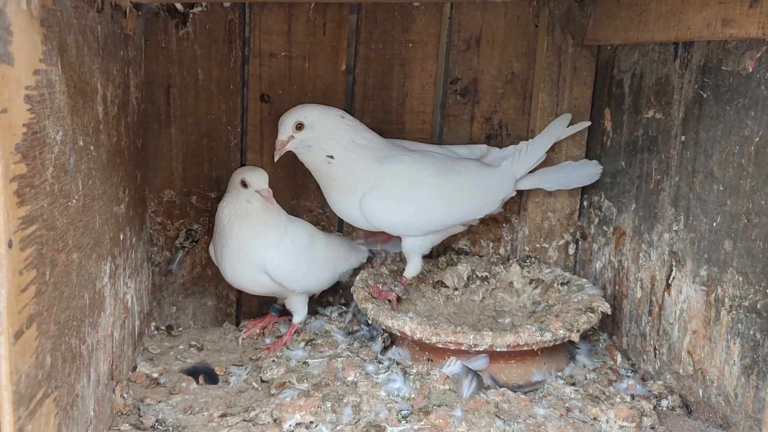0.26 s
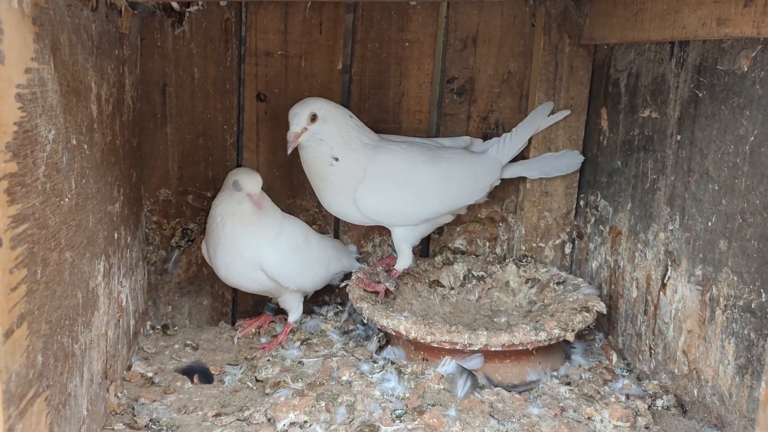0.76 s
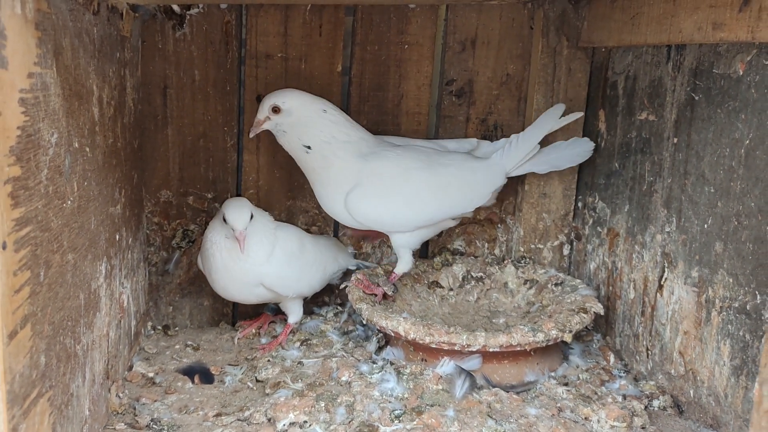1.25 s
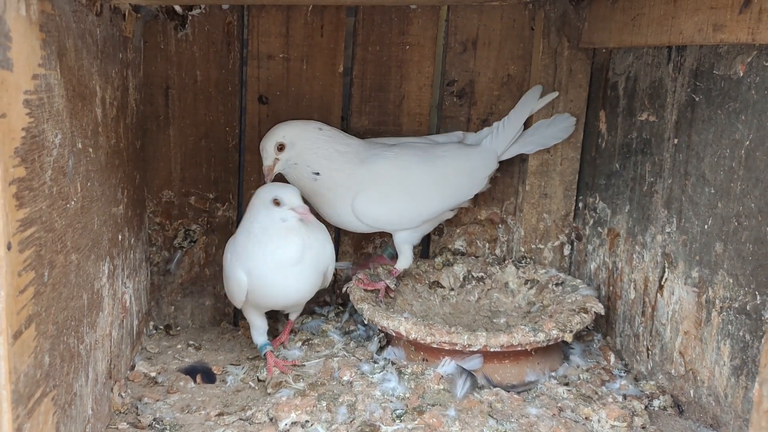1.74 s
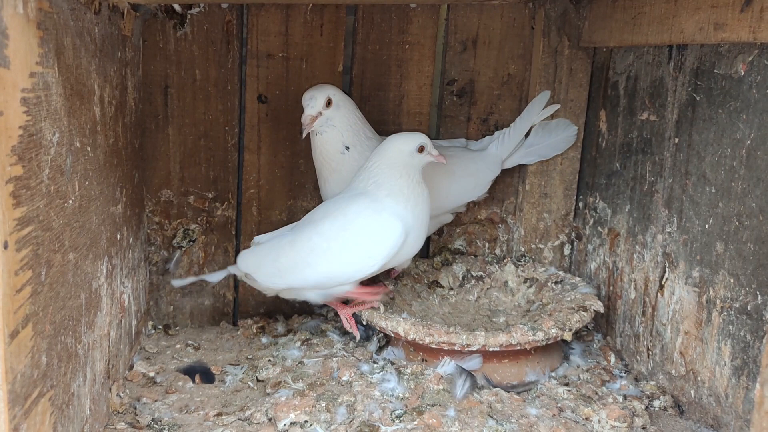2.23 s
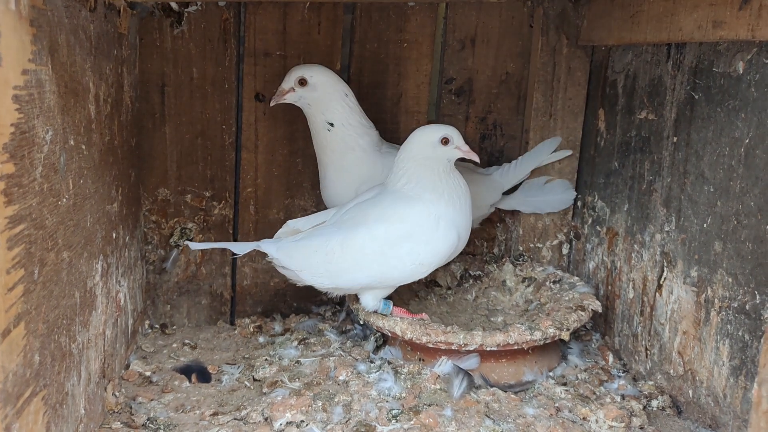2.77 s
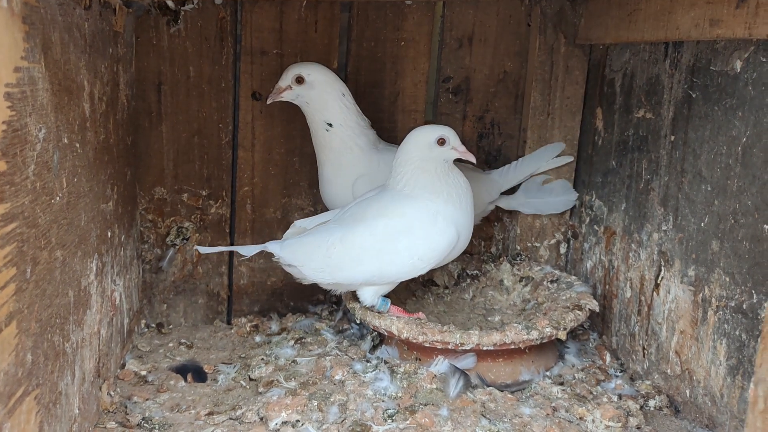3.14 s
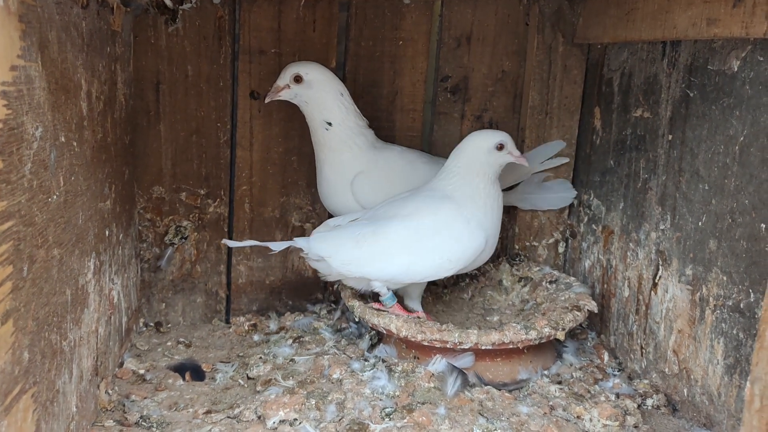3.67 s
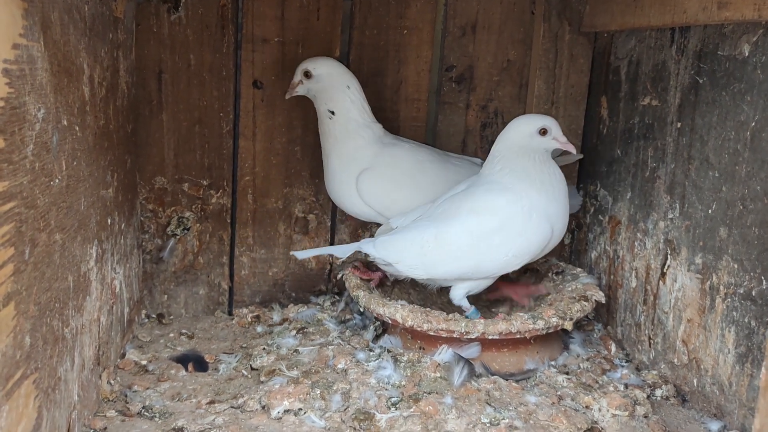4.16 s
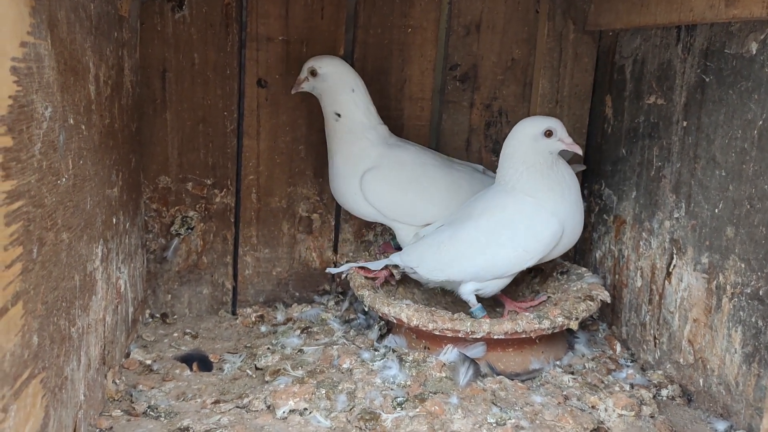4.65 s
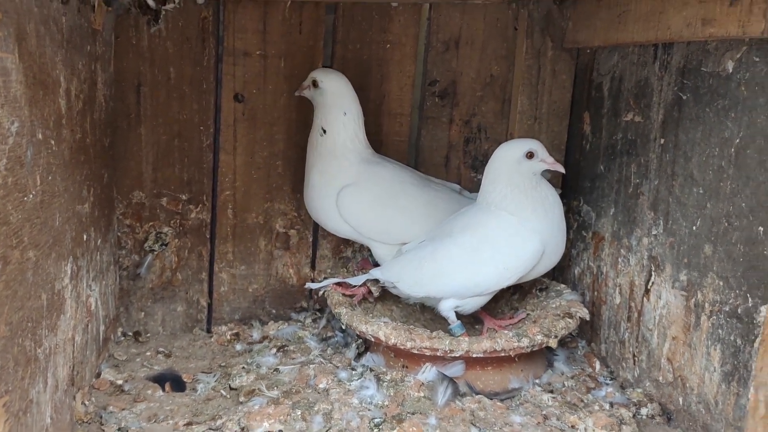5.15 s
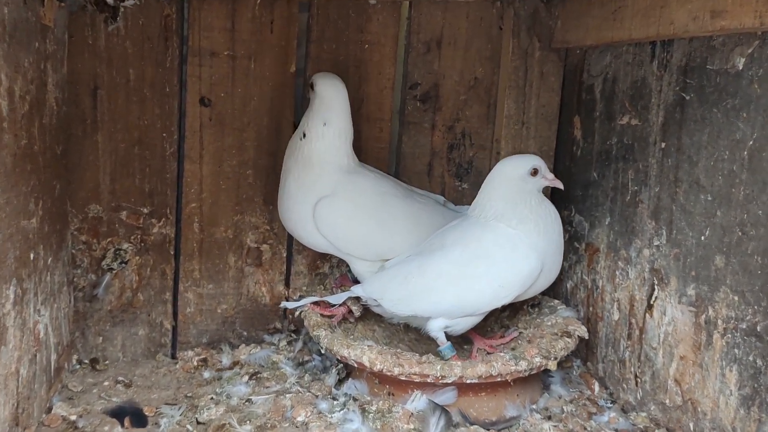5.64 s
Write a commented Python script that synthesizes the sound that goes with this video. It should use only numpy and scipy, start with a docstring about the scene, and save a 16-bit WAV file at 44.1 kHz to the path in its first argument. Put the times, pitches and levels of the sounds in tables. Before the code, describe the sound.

A low, soft rumble and faint hiss fill a small wooden nest box throughout. From the start a pigeon coos close by: short grunts, a throbbing, rattling roll at 0.3-0.6 s, then a low moan rising to a clear crest near 0.9 s. Sharp, airy feather swishes fall at about 0.15, 0.25 and 0.7 s. At 0.95-1.2 s a young bird gives a buzzy squeal and thin whistles from one side, with a soft farther coo beneath. A faint peep and claw ticks come around 1.4-1.6 s, the tick at 1.6 s clearest. The near bird rolls again at 1.7-2.0 s and moans until 2.3 s. Afterwards duller, farther coos continue, some rattling, strongest in a falling note near 3.6 s. Sparse bright clicks with small knocks on clay cluster around 2.4-4 s, then return near 4.9, 5.4 and 5.75 s. A faint two-toned peep sounds at 4.2-4.5 s.

```python
"""A wooden nest box in a loft, where pigeons court over a low rumble.
One coos close by: a crop tone with harmonics, chopped into rattles and swollen by throbs.
Others coo more softly. Young birds squeal, whistle and peep on gliding sines.
Feathers swish and rustle as resonant noise; scuffs are softer bands of it.
Claws tick on the clay nest bowl: noise bursts, each a bright click and a dull knock."""
import sys
import numpy as np
from scipy import signal
from scipy.fft import rfft, irfft, next_fast_len
from scipy.io import wavfile

SR = 44100
rng = np.random.default_rng(int(sys.argv[2]) if len(sys.argv) > 2 else 0)


def digitize_waveform(pressure):
    """Quantize a signal to 16-bit integers and store it at the path in sys.argv[1].

    Rows of a 2-D input are taken as channels; values are limited to [-1, 1].
    """
    field = np.atleast_2d(pressure).T
    bounded = np.clip(field, -1, 1)
    quanta = np.round(bounded * 32767).astype(np.int16)
    wavfile.write(sys.argv[1], SR, quanta)


N = 260190
TIME = np.arange(N) / SR

ROLL_REST_HZ = 234.6  # also the pitch of any coo between its notes
PARTNER_SHARE = 0.83  # strength of the beating tone at full rattle
ATTACK_S, RELEASE_S = 0.0074, 0.018


def from_db(db):
    """Decibels to gain."""
    return 10 ** (np.asarray(db) / 20)


def rms_one(x):
    """Scale to unit power."""
    return x / np.sqrt(np.mean(x ** 2) + 1e-20)


def at_hz(points, hz):
    """Read a spectrum on a log-frequency axis."""
    point_hz, value = np.transpose(points)
    return np.interp(np.log(np.maximum(hz, 1)), np.log(point_hz), value)


def drift(rate_hz):
    """Smooth random wander of rms 1: noise through two equal poles, at a twentieth of the rate."""
    r = np.exp(-40 * np.pi * rate_hz / SR)
    white = rng.standard_normal(N // 20 + 2002)
    slow = signal.lfilter([1], [1, -2 * r, r * r], white)[2000:]  # drop the run-in
    return np.interp(np.arange(N) / 20, np.arange(len(slow)), rms_one(slow))


def resonate(x, hz, width_hz):
    """A two-pole resonance with gain 1 on top."""
    r = np.exp(-np.pi * width_hz / SR)
    zeros = np.array([1, 0, -1]) * (1 - r * r) / 2
    return signal.lfilter(zeros, [1, -2 * r * np.cos(2 * np.pi * hz / SR), r * r], x)


def resonate_twice(x, hz, stage_width_hz):
    """Two equal resonances in series, for steeper skirts."""
    return resonate(resonate(x, hz, stage_width_hz), hz, stage_width_hz)


def butter(x, order, hz, kind="low"):
    """Butterworth low or high pass."""
    return signal.sosfilt(signal.butter(order, hz, kind, fs=SR, output="sos"), x)


def noise(spectrum, lead_ms):
    """Coloured stereo noise of rms 1, most alike in the bass, tilted between ears and early on the left."""
    # Each row: frequency in Hz, left-right likeness 0-1.
    likeness = [(70, 1), (300, 0.87), (1200, 0.28)]
    # The box's open side, on the left. Each row: frequency in Hz, left minus right in dB.
    open_side = [(700, -0.5), (2400, 3.5), (8000, 8), (15000, -4.5)]
    size = next_fast_len(N)
    hz = np.arange(size // 2 + 1) * SR / size
    mid, side = rfft(rng.standard_normal((2, size)))
    alike = np.clip(at_hz(likeness, hz), -1, 1)
    ears = np.array([[1], [-1]])
    pair = np.sqrt(1 + alike) * mid + np.sqrt(1 - alike) * side * ears
    pair = pair * np.exp(1j * np.pi * hz * ears * lead_ms / 1000)
    colour = from_db(at_hz(spectrum, hz) + ears * at_hz(open_side, hz) / 2)
    return rms_one(irfft(pair * colour, size)[:, :N])


def place(x, pan_db, lead_ms):
    """The left ear hears the source louder by pan_db and earlier by lead_ms."""
    shift_s = lead_ms / 2000
    return np.array([from_db(side * pan_db / 2) * np.interp(TIME + side * shift_s, TIME, x)
                     for side in (1, -1)])


def echoes(x, t60_s, wet_db):
    """Add dense reflections that die away, different at each ear."""
    t = TIME[:SR]
    tail = rng.standard_normal((2, SR)) * from_db(-60 * t / t60_s) * (t > .004)
    tail /= np.sqrt(np.sum(tail ** 2, axis=1, keepdims=True))
    return x + from_db(wet_db) * signal.fftconvolve(x, tail, axes=1)[:, :N]


def turn(hz):
    """Running phase of a changing frequency."""
    return 2 * np.pi * np.cumsum(hz) / SR


def along(curve):
    """Follow a curve's columns in time; the first result opens and closes the sound."""
    s, *columns = np.transpose(curve)
    gate = np.clip(np.minimum(TIME - s[0], s[-1] - TIME) / (ATTACK_S / 2), 0, 1)
    return [gate] + [np.interp(TIME, s, column) for column in columns]


def note(start, end, pitch, level_db, rattle):
    """Open and close a note; returns its gain, pitch and rattle."""
    gate = np.clip(np.minimum((TIME - start) / ATTACK_S, (end - TIME) / RELEASE_S) + .5, 0, 1)
    return gate * from_db(level_db), pitch, rattle


def phrase(notes):
    """Join notes into one voice's gain, pitch and rattle; where they overlap the louder leads."""
    gain = sum(g for g, _, _ in notes)
    weight = gain + 1e-9
    pitch = (sum(g * hz for g, hz, _ in notes) + (weight - gain) * ROLL_REST_HZ) / weight
    return gain, pitch, sum(g * rattle for g, _, rattle in notes) / weight


def glides(rows):
    """Short even notes that slide from one pitch to another."""
    notes = []
    for start, length, first_hz, last_hz, db, rattle in rows:
        end = start + length
        pitch = np.interp(TIME, [start, end], [first_hz, last_hz])
        notes.append(note(start, end, pitch, db, rattle))
    return notes


def swells(rows, width_s, rest_hz, swell_db, rattle, sharp_hz, climb_hz_per_s):
    """A bell of effort lifts pitch and level together and clears the rattle."""
    settle_s = 0.033
    notes = []
    for start, crest, end, hz, db in rows:
        slack = 1 - np.exp(-((TIME - crest) / width_s) ** 2)
        settling = sharp_hz * np.exp(-np.abs(TIME - start) / settle_s)
        climbing = climb_hz_per_s * (TIME - crest) * (1 - slack)
        pitch = hz + (rest_hz - hz) * slack + settling + climbing
        notes.append(note(start, end, pitch, db - swell_db * slack, rattle * slack ** 4))
    return notes


def arches(rows):
    """Pitch and level climb from rest to a crest and sink back."""
    rest_hz, swell_db, roundness = 213.6, 5.5, 1.6
    notes = []
    for start, crest, end, hz, db, rattle in rows:
        slack = np.interp(TIME, [start, crest, end], [1, 0, 1]) ** roundness
        notes.append(note(start, end, hz + (rest_hz - hz) * slack, db - swell_db * slack, rattle))
    return notes


def throb(pitch, throbs, half_s):
    """Brief throat openings swell the voice and pull its pitch; returns the new pitch and the swell."""
    swell = np.zeros(N)
    for s, hz, db in throbs:
        bump = np.exp(-np.minimum(np.abs((TIME - s) / half_s), 10) ** 3.114)
        pitch = pitch + (hz - pitch) * bump ** 0.341  # the pull outlasts the swell
        swell += from_db(db) * bump
    return pitch, swell


def flutter(depth, rate_hz, unevenness):
    """A slow second vibration chops the tone: quick opening, slower closing."""
    phase = turn(rate_hz * (1 + unevenness * drift(24.4)))
    grip = 1 + .3 * drift(25)
    return 1 + np.clip(depth * grip, 0, 1) * (1.3 * np.sin(phase) + 0.37 * np.sin(2 * phase) - .2)


def beating_partner(phase, offset_hz):
    """In a rattle the other side of the syrinx sounds higher and beats against the first."""
    return np.sin(phase + turn(offset_hz * (1 + .15 * drift(20))))


def loft(air_db):
    """Steady outdoor rumble and hiss, plus low box resonances driven by noise."""
    # Each row: frequency in Hz, relative level in dB.
    air_spectrum = [(20, -33), (79, 3.5), (160, -8.5), (253, 3.5), (433, -14.5), (1380, -27.5), (2630, -26),
                    (4000, -33), (7500, -34.5), (9550, -44.5), (11800, -33.5), (15500, -44)]
    # Each row: resonance in Hz, half the width of each of two stages in Hz, level in dB.
    box_modes = [(82, 7.9, -61.5), (110.3, 8.9, -54.5), (179, 18, -57), (258, 150, -59.5)]
    boom = np.zeros(N)
    for hz, half_width_hz, db in box_modes:
        boom += from_db(db) * rms_one(resonate_twice(rng.standard_normal(N), hz, 2 * half_width_hz))
    return from_db(air_db) * noise(air_spectrum, lead_ms=0.302) + place(boom, pan_db=-1.0, lead_ms=0.86)


def near_pigeon():
    """A nearly pure inflated-crop tone; throbs strengthen its overtones, rattle adds a third harmonic."""
    # Each row: start in s, length in s, first pitch in Hz, last pitch in Hz, gain in dB, rattle 0-1.
    grunts = [(0, 0.036, 238.5, 268.5, -27.5, 0.13), (.142, 0.039, 248.4, 205, -29, 1),
              (.197, 0.06, 306, 258, -33, 0.29), (.595, 0.059, 317.3, 314, -34.5, 0.66),
              (.905, 0.028, 295.2, 196, -30.5, 0.82), (1.367, 0.032, 192.2, 207.7, -29, 0.95),
              (1.408, 0.0652, 280, 245.7, -25, 0.11), (1.485, 0.072, 229.6, 237.5, -30.5, 0.26),
              (1.562, 0.029, 199, 216.7, -31, 0.83), (2.336, 0.0284, 302, 268, -33, 0.9)]
    # Throbbing rolls. Each row: start, crest and end in s, crest pitch in Hz, crest gain in dB.
    roll_rows = [(.26, .456, .59, 364, -23), (1.69, 1.862, 1.98, 356.7, -23)]
    # Closing moans. Each row: start, crest and end in s, crest pitch in Hz, crest gain in dB.
    moan_rows = [(.664, .876, .895, 304.8, -20), (2.052, 2.268, 2.302, 304.7, -20)]
    # The voice surges and catches. Each row: time in s, change of level in dB.
    surges = [(.673, 3), (.735, 4.5), (0.764, -3.5), (0.844, -1.5), (2.167, -10)]
    # Throat openings. Each row: time in s, pitch in Hz, gain in dB. The last, at 5.73 s, is a throb from a bird
    # further off, given this voice's stronger overtones.
    throbs = [(0.03, 276, -33), (0.268, 219, -28), (0.302, 243.7, -26), (0.343, 262, -24),
              (.402, 317, -19.5), (.488, 320.4, -19), (1.694, 244.2, -30), (1.73, 247.5, -23),
              (1.775, 276.8, -22.5), (1.833, 329.5, -18.5), (1.952, 281.2, -24.5), (5.728, 257, -28.5)]
    # How the box carries the fundamental. Each row: frequency in Hz, gain in dB.
    box_colour = [(220, -1.5), (305, -2.5), (330, -7.5), (360, -28)]
    # How the box carries the overtones. Each row: frequency in Hz, gain in dB.
    overtone_colour = [(440, -3), (740, -0.5)]
    surge_half_s = 0.012

    rolls = swells(roll_rows, width_s=0.11, rest_hz=ROLL_REST_HZ, swell_db=14, rattle=1,
                   sharp_hz=0, climb_hz_per_s=0)
    # a moan starts sharp, settles into a low rattle, then rises and clears towards its crest
    moans = swells(moan_rows, width_s=0.0528, rest_hz=240.1, swell_db=9.5, rattle=0.71,
                   sharp_hz=41.34, climb_hz_per_s=843)
    gain, pitch, rattle = phrase(glides(grunts) + rolls + moans)
    gain = gain * from_db(sum(db * np.exp(-((TIME - s) / surge_half_s) ** 2) for s, db in surges))
    carried = from_db(at_hz(box_colour, pitch))
    pitch, swell = throb(pitch, throbs, half_s=0.00609)

    chop = flutter(0.35 * rattle, rate_hz=80, unevenness=0.15)
    waver = (.004 + .032 * rattle) * drift(45)
    # each beat of the rattle also pushes the pitch up
    phase = turn(pitch * (1 + waver + 0.1126 * (chop - 1)))
    effort = gain * chop * from_db(3 * rattle * drift(30))

    first = effort * carried + swell
    second = from_db(-15.5) * effort * (1 - 0.18 * rattle) + from_db(-6.5) * swell
    third = from_db(-16.5) * effort * rattle + from_db(-15) * swell
    second = second * from_db(at_hz(overtone_colour, 2 * pitch))
    third = third * from_db(at_hz(overtone_colour, 3 * pitch))
    overtones = second * np.cos(2 * phase) + third * np.sin(3 * phase)
    partner = PARTNER_SHARE * rattle * gain * carried * beating_partner(phase, offset_hz=89.8)
    low = first * np.sin(phase) + partner

    # the walls send the low tone and the overtones to the ears by different paths
    voice = place(low, pan_db=-0.9, lead_ms=-0.054) + place(overtones, pan_db=-1.5, lead_ms=-0.24)
    # the closed beak and the crop hold back everything above the low overtones
    voice = butter(voice, 9, 790)
    voice = butter(voice, 2, 70, "high")
    return echoes(voice, t60_s=.18, wet_db=-13)


def feathers():
    """Stiff feathers slide in tiny slips that excite high resonances, one differing from swish to swish."""
    # Shared by all swishes. Each row: resonance in Hz, width in Hz, relative gain in dB.
    modes = [(9470, 270, 9.5), (9770, 157, 17), (9100, 20000, -7.5)]
    # Each row: peak time in s, peak gain in dB, fall in dB per s, own resonance in Hz.
    swishes = [(0.156, -47.5, 398, 6600), (0.242, -42, 525, 7300), (0.684, -41.5, 329, 6830),
               (0.729, -46, 400, 7800), (1.884, -43, 258, 7650)]
    rise_db_per_s, own_width_hz, own_db = 534.5, 170, -7.5
    slips = rng.standard_normal(N) * from_db(4 * drift(110))
    hiss = np.zeros(N)
    for k, (hz, width_hz, db) in enumerate(modes):
        hiss += (-1) ** k * from_db(db) * resonate(slips, hz, width_hz)
    hiss = rms_one(hiss)
    out = np.zeros(N)
    for s, db, fall_db_per_s, hz in swishes:
        below_db = np.maximum(rise_db_per_s * (s - TIME), fall_db_per_s * (TIME - s))
        gain = from_db(db - np.minimum(below_db, 100))
        out += gain * (hiss + from_db(own_db) * rms_one(resonate(slips, hz, own_width_hz)))
    out = butter(out, 2, 4500, "high")
    return echoes(place(out, pan_db=-10.0, lead_ms=0), t60_s=0.37, wet_db=-12)


def squeaks():
    """A young bird's buzzing squeal, its lines fraying and spreading upwards, then thin whistles."""
    # Each row: time in s, pitch in Hz, gain in dB, roughness 0-1.
    squeal = [(.945, 2557, -53, 0.03), (1, 2498, -40, 0.28), (1.058, 2633, -41, 0.68),
              (1.118, 2720, -52, 0.8)]
    # Lines a buzz apart, from two steps below the pitch. Each row: dB when clear, dB when rough.
    lines = [(-10, -34), (0, -2), (1.5, 2), (-18, 4), (-31, -1)]
    # A steep drop, a wobbling note, a far held tone. Each row of a curve: time in s, pitch in Hz, gain in dB.
    whistles = [
        [(1.124, 3600, -57), (1.139, 3137, -33.5), (1.156, 3026, -40)],
        [(1.154, 2210, -45), (1.184, 2190, -31.5), (1.193, 2194, -48), (1.204, 2187, -34.5), (1.228, 2005, -49)],
        [(2.17, 3282, -73), (2.74, 3327, -64), (2.86, 3330, -69)],
    ]
    gate, pitch, db, rough = along(squeal)
    phase = turn(pitch)
    buzz = turn(231 * (1 + .03 * drift(30)))  # line spacing in Hz
    out = np.zeros(N)
    for k, (clear_db, rough_db) in enumerate(lines):
        fray = turn(.024 * pitch * rough * drift(70))
        line_db = db + clear_db + (rough_db - clear_db) * rough
        out += gate * from_db(line_db) * np.sin(phase + (k - 2) * buzz + fray)
    for curve in whistles:
        gate, pitch, db = along(curve)
        out += gate * from_db(db) * np.sin(turn(pitch * (1 + .008 * drift(120))))
    return echoes(place(out, pan_db=8.5, lead_ms=0), t60_s=0.5, wet_db=-6)


def far_pigeons():
    """Softer, duller coos from further off, some rattling, with a longer, fainter echo."""
    # Each row: start, crest and end in s, crest pitch in Hz, crest gain in dB, rattle 0-1.
    coos = [(1.08, 1.2, 1.53, 263.6, -37.5, 0.43), (2.4, 2.65, 2.98, 255.1, -44, 0),
            (3.09, 3.22, 3.47, 254, -41.5, 0.82), (3.35, 3.46, 3.5, 259.2, -39.5, 0.44),
            (4.14, 4.32, 4.57, 264.7, -40.5, 0.05), (4.5, 4.57, 4.6, 323.2, -42, 0.75),
            (4.66, 4.79, 4.89, 327.6, -40, 0.08), (5.05, 5.19, 5.33, 271, -40.5, 0),
            (5.67, 5.705, 5.83, 342, -37, 0.12)]
    # Falling notes. Each row: start in s, length in s, first and last pitch in Hz, gain in dB, rattle 0-1.
    sighs = [(3.018, 0.051, 311.6, 251.1, -34, 0), (3.595, 0.16, 356.9, 313.2, -30.5, 0.63),
             (3.753, 0.044, 303.8, 286.4, -29, 0.27), (3.8, 0.1067, 279, 246.4, -38.5, 0.94),
             (4.815, 0.043, 320, 270, -37, 0.02)]
    # Throat openings. Each row: time in s, pitch in Hz, gain in dB.
    throbs = [(2.764, 281, -32.5), (2.851, 295.5, -28), (3.321, 334.6, -38.5), (3.438, 285.3, -35),
              (3.633, 372, -38), (4.59, 291.7, -27.5)]
    gain, pitch, rattle = phrase(arches(coos) + glides(sighs))
    pitch, swell = throb(pitch, throbs, half_s=0.012)
    phase = turn(pitch * (1 + .016 * drift(40)))
    wavering = gain * from_db(2.4 * drift(20))
    level = wavering * flutter(0.42 * rattle, rate_hz=62, unevenness=0.286) + swell
    voice = level * (np.sin(phase) + from_db(-21) * np.sin(2 * phase))
    voice = voice + PARTNER_SHARE * rattle * wavering * beating_partner(phase, offset_hz=66.5)
    voice = butter(voice, 6, 560)
    return echoes(place(voice, pan_db=1.5, lead_ms=0.4), t60_s=0.38, wet_db=-25.0)


def peep_whistle(hz):
    """One side of the syrinx: an uneven whistle with a faint octave."""
    level = from_db(3 * drift(35))
    phase = turn(hz * (1 + .004 * drift(60)))
    return level * (np.sin(phase) + from_db(-15) * np.sin(2 * phase))


def peeps():
    """The two sides of the syrinx whistle together, each on its own gliding pitch."""
    # One curve a peep. Each row: time in s, lower voice in Hz, upper voice in Hz, gain in dB.
    curves = [
        [(1.415, 3305, 3970, -54), (1.52, 3648, 4210, -58.5), (1.543, 3960, 4140, -51.5),
         (1.568, 3800, 3800, -61)],
        [(4.19, 3770, 4153, -64), (4.23, 3543, 4027, -61), (4.342, 4038, 4416, -55), (4.385, 3897, 4390, -57.5),
         (4.41, 3947, 4520, -51), (4.468, 3690, 4270, -56)],
    ]
    out = np.zeros(N)
    for curve in curves:
        gate, lower_hz, upper_hz, db = along(curve)
        out += gate * from_db(db) * (peep_whistle(lower_hz) + from_db(-2) * peep_whistle(upper_hz))
    return echoes(place(out, pan_db=8, lead_ms=0), t60_s=.2, wet_db=-5)


def claws(click_t60_s, knock_t60_s):
    """Each step is a short grainy slide into a bright click and a duller knock."""
    # Each row: landing in s, tap gain in dB, knock relative to the tap in dB; both before layer trims.
    taps = [(1.422, -48.5, -23), (1.591, -36, -25), (2.378, -48, -43), (2.447, -45.5, -43),
            (2.915, -54, -10.5), (3.064, -40, -26.5), (3.145, -62.5, -3.5), (3.328, -49.5, -21),
            (3.431, -48.5, -43), (3.528, -59, -3), (3.936, -60.5, -6), (4.024, -50, -28), (4.873, -52, -39),
            (5.387, -60, -4.5), (5.425, -47.5, -40), (5.749, -57, -4)]
    # Each row: frequency in Hz, relative level in dB.
    click_spectrum = [(1500, -7), (4000, -0.5), (7200, 7.5), (9500, -3.5), (11800, 4), (15000, -11)]
    # Each row: frequency in Hz, relative level in dB.
    knock_spectrum = [(250, -51), (700, 2.5), (1500, -9), (2700, -5.5), (4500, -23)]
    slide_s = .002
    click, knock = np.zeros((2, N))
    for s, db, knock_db in taps:
        near = np.abs(TIME - s) < .5
        t = TIME[near] - s
        contact = np.exp(-(np.minimum(t, 0) / slide_s) ** 2)
        fall_db = 60 * np.maximum(t, 0)
        click[near] += contact * from_db(db - fall_db / click_t60_s)
        knock[near] += contact * from_db(db + knock_db - fall_db / knock_t60_s)
    bright = from_db(0.5 + 2 * drift(390)) * click * noise(click_spectrum, lead_ms=0)
    dull = from_db(19) * knock * noise(knock_spectrum, lead_ms=0.25)
    return echoes(bright + dull, t60_s=0.094, wet_db=-4)


def scuffs():
    """Soft, grainy scratches: brief bands of noise with a jittering level."""
    # Each row: time in s, half length in s, centre in Hz, gain in dB.
    scratches = [(1.449, 0.011, 835, -44), (1.905, 0.041, 2958, -55.5)]
    out = np.zeros(N)
    for s, half_s, hz, db in scratches:
        band = rms_one(resonate_twice(rng.standard_normal(N), hz, 0.3 * hz))
        out += from_db(db) / (1 + ((TIME - s) / half_s) ** 4) * band
    out = out * from_db(4 * drift(130))
    return echoes(place(out, pan_db=7.0, lead_ms=0.35), t60_s=0.21, wet_db=-12)


def rustles():
    """Faint glassy hisses as the birds shift their feathers: a narrow, very high noise band."""
    # Each row: time in s, peak level in dB.
    shifts = [(3.432, -44), (4.601, -53), (5.64, -54)]
    swell = sum(from_db(db) / (1 + ((TIME - s) / 0.011) ** 2) for s, db in shifts)
    return swell * rms_one(resonate(rng.standard_normal((2, N)), 11640, 190))


def scene():
    """All the birds and their surroundings."""
    coos = near_pigeon() + far_pigeons()
    young = squeaks() + peeps()
    plumage = feathers() + rustles()
    steps = claws(click_t60_s=0.03, knock_t60_s=0.1) + scuffs()
    return loft(air_db=-47.0) + coos + young + plumage + steps


def record(dry):
    """The top is cut steeply."""
    cutoff_hz = 15700
    return signal.sosfilt(signal.ellip(10, .2, 80, cutoff_hz, fs=SR, output="sos"), dry)


dry = scene()
out = record(dry)
digitize_waveform(out)
```